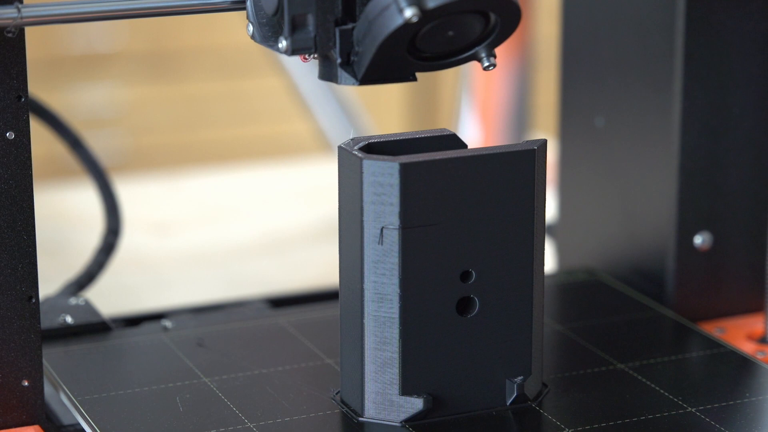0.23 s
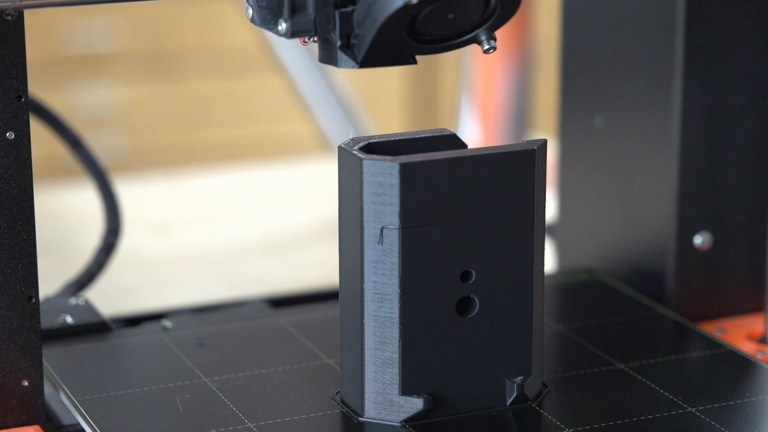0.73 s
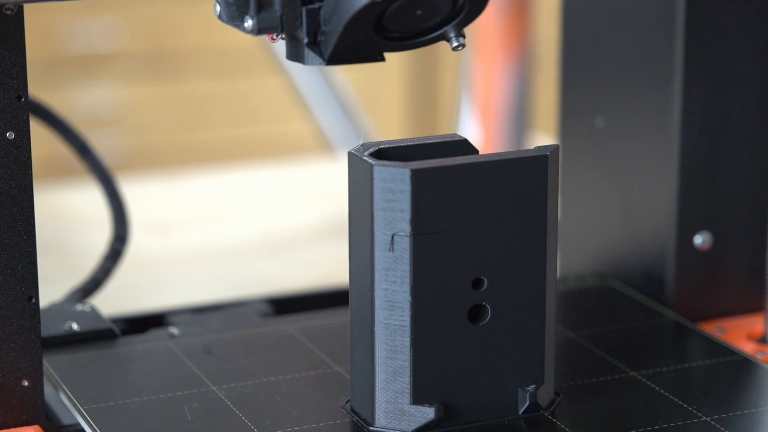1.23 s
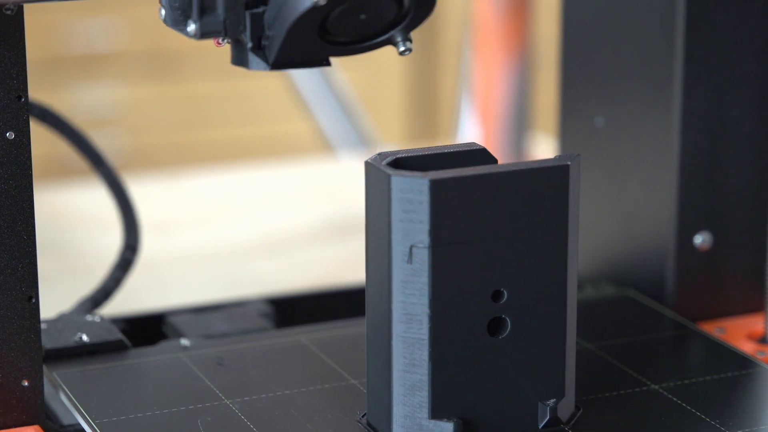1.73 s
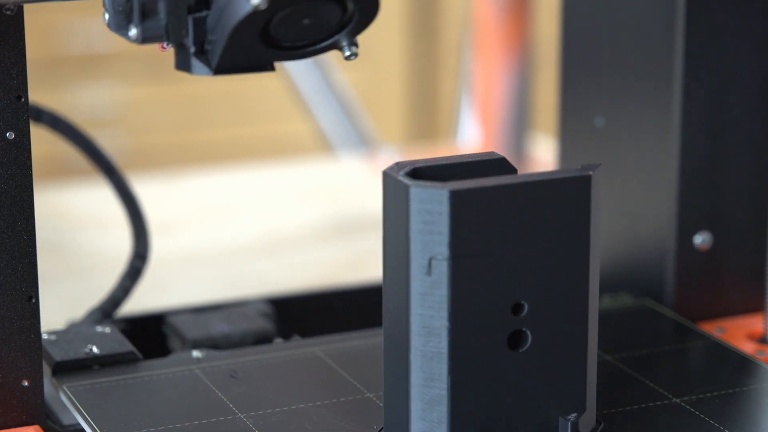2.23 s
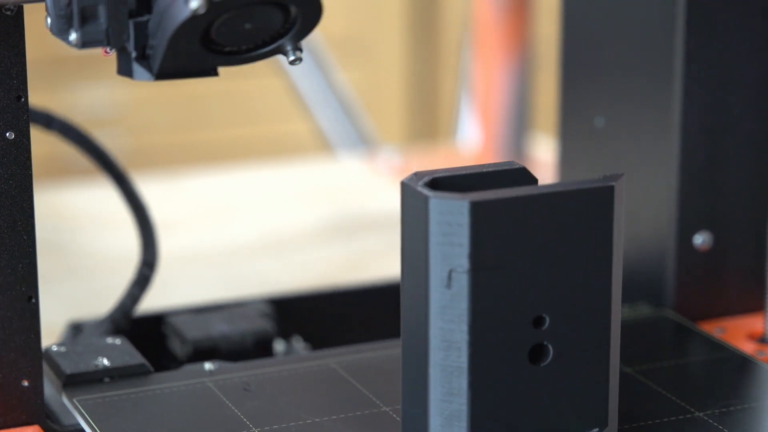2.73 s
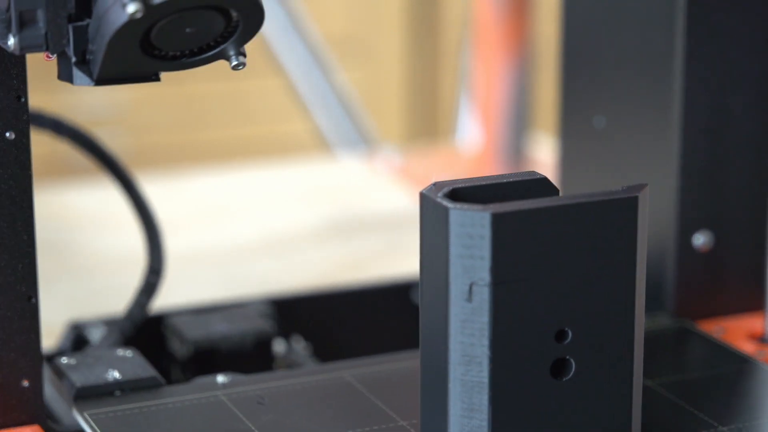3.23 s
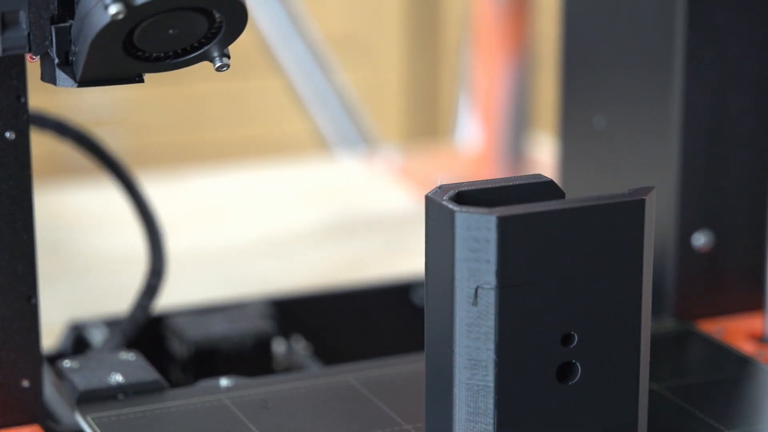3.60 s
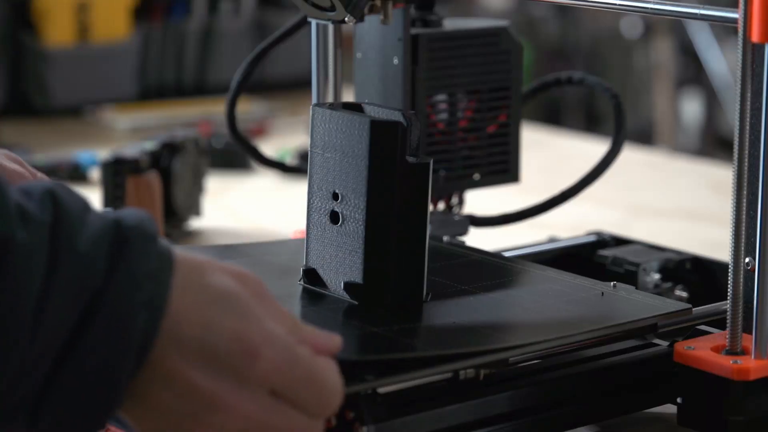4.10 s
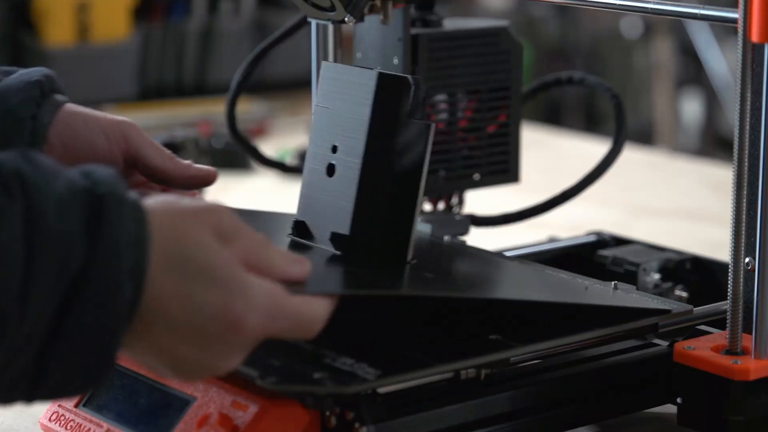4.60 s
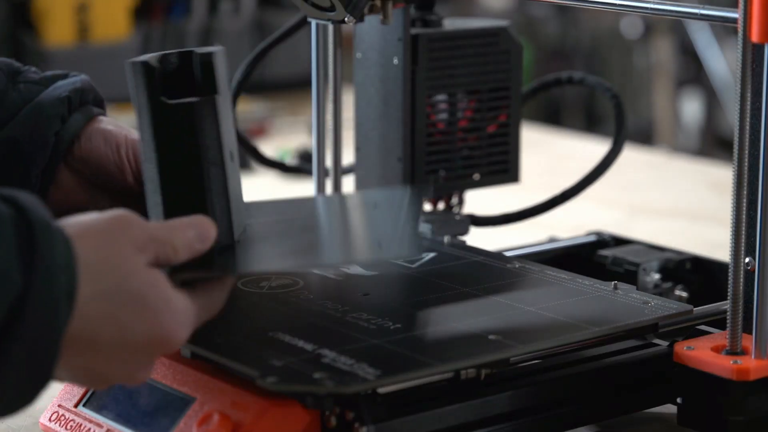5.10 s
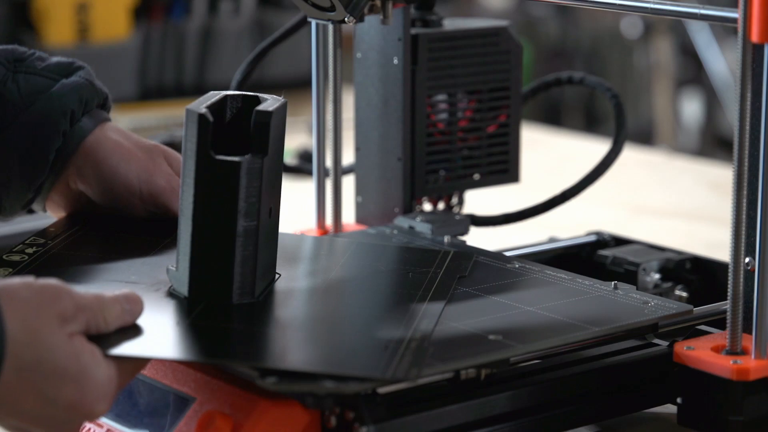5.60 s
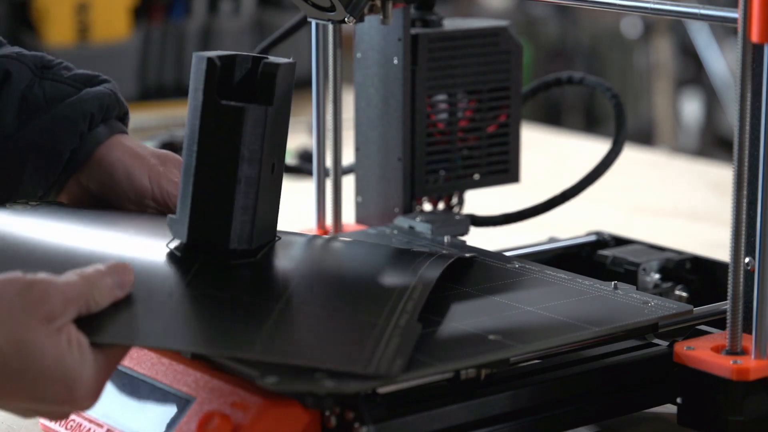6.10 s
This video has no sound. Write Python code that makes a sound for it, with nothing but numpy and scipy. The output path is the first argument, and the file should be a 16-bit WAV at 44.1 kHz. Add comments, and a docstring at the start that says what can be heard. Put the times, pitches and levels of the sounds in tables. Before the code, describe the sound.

Close view of a desktop 3D printer in a small workshop. A faint low motor hum with thin treble hiss gives way to a steady harmonic whine with small rattles, which brakes suddenly. Then bassier room air, cloth and skin sliding, a steel sheet rubbing, one hard knock, and a cluster of very loud, bright cracks with short metallic ringing as it is flexed.

```python
"""A desktop 3D printer's last travel: carriage and bed motors whine together, as harmonics of their step rates.
A slow humming move precedes it; the stepper drivers hiss in the high treble and moving parts rattle.
Then hands lift the spring-steel sheet off the bed (rubbing and sliding noise), knock it down again and flex it
until the printed part cracks loose: noise cracks with ringing modes. A small workshop adds diffuse reflections."""
import sys
import numpy as np
from scipy import signal
from scipy.fft import rfft, irfft, next_fast_len
from scipy.io import wavfile

SR = 44100
rng = np.random.default_rng(int(sys.argv[2]) if len(sys.argv) > 2 else 0)


def output_pcm(signal):
    """Save a mono or channel-first signal as 16-bit PCM at the path in sys.argv[1].

    Samples are clipped to [-1, 1] before scaling.
    """
    pcm = np.clip(np.atleast_2d(signal).T, -1, 1) * 32767
    wavfile.write(sys.argv[1], SR, np.round(pcm).astype(np.int16))


N = 280255
T = np.arange(N) / SR
HANDLING_START_S = 3.85  # the background also turns bassier here

# bed driver's hiss colour: (frequency [Hz], relative density [dB per Hz])
BED_DRIVER_COLOUR = [(12800, -40), (13700, -18), (14350, -9), (14750, -21), (15300, -6), (15750, -6),
                     (16100, -14)]
# reverberation time of the workshop: (frequency [Hz], t60 [s])
ROOM_DECAY = [(200, 0.85), (1000, 0.41), (5000, 0.41), (10000, 0.3), (16000, 0.34)]


def from_db(db):
    """Decibels to gain."""
    return 10 ** (np.asarray(db) / 20)


def rms_one(x):
    """Scale to rms 1."""
    return x / np.sqrt(np.mean(x ** 2) + 1e-20)


def at_hz(points, hz):
    """Interpolate a table on a log-frequency axis."""
    points = np.array(points)
    return np.interp(np.log(hz + 1e-9), np.log(points[:, 0]), points[:, 1])


def after(start_s, fade_s):
    """Smooth step from 0 to 1, centred on start_s."""
    return .5 + .5 * np.tanh((T - start_s) / fade_s)


def swell(peak_s, half_width_s):
    """Bell that reaches 1 at peak_s."""
    return np.exp(-np.minimum(((T - peak_s) / half_width_s) ** 2, 20))


def noise(colour):
    """Coloured noise, falling 12 dB per octave more below its first point; rms 1."""
    size = next_fast_len(N)
    hz = np.fft.rfftfreq(size, 1 / SR)
    gain = from_db(at_hz(colour, hz)) * np.minimum(hz / colour[0][0], 1) ** 2
    spectrum = gain * rfft(rng.standard_normal(size))
    return rms_one(irfft(spectrum)[:N])


def drift(rate_hz):
    """Slow random signal: white noise through two poles at rate_hz; spread 1."""
    hop, settle = 40, 2000  # drawn at SR / 40; the filter's start-up is dropped
    r = np.exp(-2 * np.pi * rate_hz * hop / SR)
    white = rng.standard_normal(N // hop + settle + 2)
    slow = signal.lfilter([1], [1, -2 * r, r * r], white)[settle:]
    return np.interp(np.arange(N) / hop, np.arange(len(slow)), rms_one(slow))


def narrow(hz, width_hz):
    """Resonance shaken at random: a carrier with drifting quadratures; rms 1."""
    in_phase = drift(width_hz) * np.cos(2 * np.pi * hz * T)
    quadrature = drift(width_hz) * np.sin(2 * np.pi * hz * T)
    return rms_one(in_phase + quadrature)


def dying_noise(t, level_db, t60):
    """Third-octave noise bands, each with its own level and decay; level_db is a function of Hz."""
    edges_hz, out = np.geomspace(120, 18000, 23), 0
    for low, high in zip(edges_hz, edges_hz[1:]):
        hz = np.sqrt(low * high)
        decay = from_db(-60 * t / at_hz(t60, hz))
        band_pass = signal.butter(2, [low, high], "band", fs=SR, output="sos")
        band = signal.sosfilt(band_pass, rng.standard_normal(len(t)) * decay + 1e-18)
        # band power follows its bandwidth and mean decay power
        band_rms = np.sqrt(np.mean(decay ** 2) * (high - low) * 2 / SR)
        out = out + rms_one(band) * band_rms * from_db(level_db(hz))
    return out


def workshop(x, wall_edge_hz=11000, build_s=0.0084):
    """Diffuse reflections that build up in milliseconds and mostly die sooner in the treble."""
    t = np.arange(SR * 2 // 3) / SR
    tail = dying_noise(t, lambda hz: -10 * np.log10(1 + (hz / wall_edge_hz) ** 2), ROOM_DECAY)
    tail = tail * (1 - np.exp(-(t / build_s) ** 2))
    return signal.fftconvolve(x, tail / np.sqrt(np.sum(tail ** 2)))[:N]


def motor(turns, orders, flutter, flutter_hz):
    """Harmonics of the base rate; the shaking frame makes each flutter in level and phase."""
    out = 0
    for order, db in orders:
        phase = 2 * np.pi * (order * turns + rng.random())
        steady = (1 + flutter * drift(flutter_hz)) * np.sin(phase)
        out = out + from_db(db) * (steady + flutter * drift(flutter_hz) * np.cos(phase))
    return np.sqrt(2) * out


def driver_hiss(turns, colour, depth_db, locked=.4):
    """Current-chopper hiss in bursts locked to the coil current; the share `locked` repeats cyclically."""
    hiss = noise(colour)
    cycle_samples = 1 / np.max(np.diff(turns))  # at full speed
    repeating = sum(np.roll(hiss, round(k * cycle_samples)) for k in range(8))
    mixed = np.sqrt(locked) * rms_one(repeating) + np.sqrt(1 - locked) * noise(colour)
    pulsing_db = depth_db * (np.cos(2 * np.pi * turns) + .7 * np.cos(4 * np.pi * turns))
    return rms_one(mixed * from_db(pulsing_db + drift(40)))


def step_buzz(turns):
    """The bed's step edges add a faint comb of high harmonics of its step rate; rms 1."""
    steps_per_cycle = 8
    orders = [(k, 0) for k in range(5, 13)]
    return rms_one(motor(steps_per_cycle * turns, orders, flutter=0.52, flutter_hz=37))


def background():
    """Coloured room air, giving way to bassier air with a low hum."""
    # air colour before handling: (frequency [Hz], relative density [dB per Hz])
    room_colour = [(18, -69), (30, -43), (53, -7.5), (210, -9.5), (295, -22), (394, -16.5), (584, -20.5),
                   (1960, -35.5), (2540, -33), (2900, -36), (5500, -51.5), (16000, -52)]
    # air colour during handling: (frequency [Hz], relative density [dB per Hz])
    bench_colour = [(25, -6.5), (45, 6.5), (65, 6), (110, 4.5), (145, -8.5), (300, -11), (650, -16.5),
                    (1200, -24.5), (2500, -30), (6000, -48), (10000, -48), (16000, -50)]
    air = from_db(-48.0) * noise(room_colour) * (1 - after(HANDLING_START_S, 0.0044))
    hum = motor(45.4 * T, [(1, -51.992)], flutter=.3, flutter_hz=3.4)
    bench = after(HANDLING_START_S, 0.0041) * (from_db(-42.5) * noise(bench_colour) + hum)
    return air + bench


def frame_shudder():
    """The frame shudders after braking: a damped 66 Hz sine."""
    start_s, decay_s = 3.45, 0.16
    envelope = after(start_s, 0.0092) * np.exp(-abs(T - start_s) / decay_s)
    return from_db(-34.5) * envelope * np.sin(2 * np.pi * 66 * T)


def sheet_wobble():
    """The flexed sheet wobbles in its lowest bending mode, swelling and settling."""
    return swell(5.95, .42) * motor(72.5 * T, [(1, -41.5)], flutter=0.087, flutter_hz=6.5)


def rattles():
    """Short bursts of dense ticking from the moving parts, which also knock the frame."""
    # bursts: (peak time [s], rise [s], fall [s], peak ticking level [dB rms], peak knock level [dB rms])
    bursts = [(0.019, 0.0073, 0.023, -53, -50), (.122, .006, 0.0057, -56, -47.5),
              (.152, 0.0019, 0.022, -51.5, -53), (1.037, .0015, 0.0042, -38, -28.5),
              (2.16, 0.031, 0.056, -50.5, -55), (2.562, 0.0085, 0.0087, -27.5, -57),
              (2.585, 0.0038, 0.028, -36, -48), (3.428, 0.0094, 0.0024, -47, -41)]
    # ticking colour: (frequency [Hz], relative density [dB per Hz])
    tick_colour = [(900, -26), (1550, 6), (1850, -13), (2230, 6), (2550, -3.5), (3800, 0), (7000, -5),
                   (10500, -3.5), (13000, -15), (16000, -18)]
    shapes = []
    for peak_s, rise_s, fall_s, *_ in bursts:
        distance = np.maximum((peak_s - T) / rise_s, (T - peak_s) / fall_s)
        shapes.append(np.exp(-distance.clip(0, 20)))
    tick_level, knock_level = from_db(np.array(bursts)[:, 3:].T) @ np.array(shapes)
    ticking = rms_one(noise(tick_colour) * from_db(2.3 * drift(300)))
    return tick_level * ticking + knock_level * narrow(1750, 260)


def handling():
    """Grainy rubbing and sliding as the sheet is lifted and carried; strokes add in power."""
    # hand strokes: (peak time [s], half-width [s], rub on bed [dB rms], slide of sleeve and skin [dB rms])
    hand_strokes = [(3.86, 0.089, -57.5, -78), (3.997, 0.023, -45.5, -63), (4.44, 0.086, -59, -59),
                    (4.58, 0.089, -52, -54), (4.72, 0.056, -40, -45), (4.81, 0.05, -48, -66),
                    (4.98, 0.044, -70, -61), (5.07, 0.017, -61, -52), (5.14, 0.052, -59, -71),
                    (5.245, .035, -63, -59), (5.33, 0.027, -74, -60), (5.47, 0.041, -59, -51.5),
                    (5.72, 0.025, -49, -61)]
    # rubbing colour: (frequency [Hz], relative density [dB per Hz])
    rub_colour = [(400, -15.5), (650, 1), (950, 6.5), (1200, -2.5), (1550, 0.5), (2500, -3.5), (3300, -1),
                  (4500, 1.5), (6500, -1), (8700, -4.5), (10500, -11.5), (16000, -22.5)]
    # sliding colour: (frequency [Hz], relative density [dB per Hz])
    slide_colour = [(2000, -32), (5000, -2.5), (9000, 3), (14000, 1), (16000, 1.5)]
    carry = (5.06, 1.1, -63.5, -66)  # faint rustle under the strokes, same columns
    scratch_db = 2.6  # spread of the grain
    strokes = np.array([*hand_strokes, carry])
    shapes = np.array([swell(peak_s, half_width_s) for peak_s, half_width_s, *_ in strokes])
    rub_level, slide_level = np.sqrt(from_db(strokes[:, 2:].T) ** 2 @ shapes ** 2)
    rub = rub_level * rms_one(noise(rub_colour) * from_db(scratch_db * drift(200)))
    slide = slide_level * rms_one(noise(slide_colour) * from_db(scratch_db * drift(300)))
    return after(HANDLING_START_S, 0.0031) * (rub + slide)


def sheet_hits():
    """Each contact gives a short crack, sets the sheet ringing and scatters into the room."""
    # knocks and cracks: (time [s], crack [dB], treble edge [Hz], treble tilt [dB per octave], ring [dB])
    hits = [(4.0256, -28, 4960, -2, -43.5), (4.2083, -12.5, 9200, -1, -35.5),
            (4.3716, -42, 14000, -3.5, -73), (4.562, -44, 8000, -8.5, -46), (5.306, -44, 8000, 1, -67),
            (5.3295, -48, 8000, -8, -64), (5.4774, -14.5, 7540, -2.5, -34), (5.5301, -9.5, 9950, -2, -21.5),
            (5.7392, -4, 15900, 1, -33), (6.014, -46, 8000, -1.5, -69.5), (6.114, -25.5, 10200, -3, -43),
            (6.127, -40, 14000, -3, -57), (6.224, -36, 6000, -4, -50)]
    # ringing modes: (frequency [Hz], relative level [dB], t60 [s])
    modes = [(170, -13.5, 0.13), (228, -16.5, 0.2), (395, -11, 0.19), (453, -12.5, 0.62),
             (555, -10.5, 0.17), (641.3, 0.5, 0.37), (663, -2.5, 0.11), (724, -16.5, 0.18),
             (820, -17.5, 0.36), (906, -10, 0.44), (976, -7.5, 0.3), (1103, -8.5, 0.49),
             (1470, -11.5, 0.18), (1560, -8.5, 0.13), (1670, -27, 0.28), (2320, -20, 0.16),
             (2280, -18, 0.46), (2490, 0, 0.095)]
    # dense, quickly damped high modes: (frequency [Hz], relative density [dB per Hz])
    crack_colour = [(150, -16), (400, -12.5), (800, -5), (1220, -8.5), (1600, -2), (1900, -3), (2500, -4.5),
                    (3100, -2.5), (4050, 2.5), (4900, 0.5), (5700, 1.5), (7800, 1), (9000, 2), (16000, 5.5)]
    # their decay: (frequency [Hz], t60 [s])
    crack_t60 = [(200, 0.078), (1000, 0.075), (4000, 0.023), (8000, 0.015), (16000, 0.0089)]
    # crowd of weaker modes: (frequency [Hz], relative density [dB per Hz])
    clatter_colour = [(150, -9), (320, -15), (620, -7.5), (1080, -1.5), (1220, -17), (1500, -18),
                      (2600, -7), (5000, -8.5), (8500, -10.5), (11000, -32), (16000, -42)]
    # their decay: (frequency [Hz], t60 [s])
    clatter_t60 = [(200, 0.15), (1000, 0.11), (16000, 0.2)]
    # colour of the room's reflections: (frequency [Hz], relative level [dB])
    scatter_colour = [(200, 3), (800, 15), (2000, 5.5), (5000, -1), (16000, -7.5)]
    lift_s = 4.5
    out, t = np.zeros(N + SR), np.arange(SR // 2) / SR
    for hit_s, crack_db, edge_hz, tilt_db, ring_db in hits:

        def crack_level(hz):
            tilted = at_hz(crack_colour, hz) + tilt_db * np.log2(hz / 4000)
            return tilted - 10 * np.log10(1 + (hz / edge_hz) ** 8)

        hit = from_db(crack_db) * dying_noise(t, crack_level, crack_t60)
        # the sheet radiates differently in every direction, so its reflections blend into a smooth tail
        tail = dying_noise(t, lambda hz: crack_level(hz) + at_hz(scatter_colour, hz), ROOM_DECAY)
        hit += from_db(crack_db - 20) * (1 - np.exp(-t / 0.0027)) * tail
        hit += from_db(ring_db + 1) * dying_noise(t, lambda hz: at_hz(clatter_colour, hz), clatter_t60)
        # held by the bed's magnets it is stiffer and rings higher
        pitch = 1.08 if hit_s < lift_s else 1
        for hz, db, t60_s in modes:
            # every mode is a close pair that beats
            phase = 2 * np.pi * pitch * hz * t
            detune = 1 + rng.choice([-1, 1]) * rng.uniform(.01, .03)
            pair = rng.choice([-1, 1]) * (np.sin(phase) + .5 * np.sin(phase * detune))
            hit += from_db(ring_db + db - 4.5 - 60 * t / t60_s) * pair
        start = round(hit_s * SR)
        out[start:start + len(t)] += hit
    return out[:N]


def slow_move():
    """The slow move: low motor hum, driver hiss, bearing noise and a thin whistle."""
    # motor vibration: (multiple of base rate, level [dB rms])
    creep_orders = [(2, -58.5), (3, -51), (4, -51.5), (6, -59.5), (8, -64), (12, -65), (20, -72.5),
                    (27, -73), (33, -77), (55, -77)]
    # bearing noise colour: (frequency [Hz], relative density [dB per Hz])
    bearing_colour = [(30, -20), (62, 3.5), (130, -4.5), (300, -29), (700, -18), (1200, -24), (2000, -26.5),
                      (3200, -34), (4200, -29.5), (5500, -33.5), (7500, -34.5), (10000, -30.5),
                      (16000, -31)]
    creep_hz, end_s = 74.8, 0.98
    turns = creep_hz * T
    hum = motor(turns, creep_orders, flutter=0.38, flutter_hz=13.0)
    hiss = from_db(-49.5) * driver_hiss(turns, BED_DRIVER_COLOUR, depth_db=2.5)
    whistle = from_db(-66.5) * narrow(6390, 42)
    bearings = from_db(-48) * noise(bearing_colour)
    return (1 - after(end_s, .01)) * (hum + hiss + whistle + bearings)


def travel():
    """Carriage and bed speed up together, run steadily and brake; motor pitch follows speed."""
    # carriage motor vibration: (multiple of base rate, level [dB rms])
    carriage_orders = [(3, -55), (4, -52.5), (8, -65), (10, -54.5), (11, -52.5), (17, -70), (21, -58)]
    # bed motor vibration before the approach gain: (multiple of base rate, level [dB rms])
    bed_orders = [(1, -65.5), (2, -42), (3, -68.5), (6, -52.5), (9, -57), (11, -62.5)]
    # belt or frame resonances lifting an order: (peak time [s], half-width [s], multiple, peak [dB rms])
    resonances = [(1.1, 0.44, 7, -48), (1.3, 0.6, 16, -55.5), (1.45, 2.4, 5, -47), (1.72, 1.29, 6, -35),
                  (2.5, 0.31, 16, -56), (3.35, 0.9, 7, -54), (3.38, 0.16, 16, -61.5)]
    # carriage driver's hiss colour: (frequency [Hz], relative density [dB per Hz])
    carriage_driver_colour = [(7500, -10), (9200, -7.5), (10400, -1.5), (10900, -5), (11800, 1.5),
                              (12100, 1), (12400, -18), (12800, -9), (14000, -9.5)]
    # motor housing resonances: (frequency [Hz], width [Hz], level at full speed [dB rms])
    housing = [(8900, 79, -66.5), (11870, 76, -68.5), (12330, 110, -59)]
    # rolling noise colour: (frequency [Hz], relative density [dB per Hz])
    rail_colour = [(30, -12), (60, 7), (100, 8), (140, -16), (230, 3.5), (330, -14.5), (570, -11.5),
                   (900, -12.5), (1500, -15), (2600, -22), (4100, -21.5), (6000, -28), (10000, -29.5),
                   (16000, -21.5)]
    carriage_hz, bed_hz = 188.93, 124.0  # base rates at full speed
    start_s, stop_s, ramp_s = .942, 3.447, .057
    bed_near_s, bed_near_db, bed_rise_db_per_s = 2.38, 1.7, 5
    pulse_db = 3.0
    hiss_at_rest = 0.2  # share of the hiss gain left as speed nears zero

    speed = np.clip(np.minimum(T - start_s, stop_s - T) / ramp_s, 0, 1)
    full_speed_s = np.cumsum(speed) / SR  # distance as time at full speed
    carriage_turns, bed_turns = carriage_hz * full_speed_s, bed_hz * full_speed_s

    carriage = motor(carriage_turns, carriage_orders, flutter=0.18, flutter_hz=44)
    belt_turns = carriage_turns + 0.0065 * drift(7.8)
    belt = 0
    for peak_s, half_width_s, order, db in resonances:
        lifted = motor(belt_turns, [(order, db)], flutter=0.09, flutter_hz=30)
        belt = belt + swell(peak_s, half_width_s) * lifted
    # the bed grows louder as it comes forward, until it is near
    bed_db = bed_near_db - bed_rise_db_per_s * np.maximum(bed_near_s - T, 0)
    bed = from_db(bed_db) * motor(bed_turns, bed_orders, flutter=.2, flutter_hz=4.6)
    buzz = from_db(-61.5) * step_buzz(bed_turns)
    # all but the bed's own whine builds only near full speed
    whine = speed ** 4 * (carriage + belt + buzz) + speed * bed

    hiss = from_db(-42.5) * driver_hiss(bed_turns, BED_DRIVER_COLOUR, pulse_db, locked=0.38)
    hiss += from_db(-53) * driver_hiss(carriage_turns / 2, carriage_driver_colour, pulse_db, locked=0.18)
    hiss += sum(from_db(db) * narrow(hz, width_hz) for hz, width_hz, db in housing)
    hiss *= hiss_at_rest + (1 - hiss_at_rest) * speed
    running = after(0.92, 0.0082) * (1 - after(3.433, 0.0071))
    hiss *= running

    # on the ramps the fifth order sweeps roughly, loudest at half speed
    fifth_order = motor(5 * carriage_turns, [(1, 0)], flutter=.45, flutter_hz=70)
    sweep = from_db(-43) * 4 * speed * (1 - speed) * fifth_order
    rolling = running * from_db(-43.5) * noise(rail_colour)
    room_send = from_db(-7.5) * (rolling + sweep) + from_db(-28) * hiss + from_db(-17) * whine
    return whine + sweep + hiss + rolling + workshop(room_send)


def scene():
    """Sum printer, sheet, hands and room into one channel."""
    small = rattles() + handling()
    small_room = workshop(from_db(-11) * small)
    sheet = sheet_hits() + sheet_wobble()
    printer = slow_move() + travel() + frame_shudder()
    return (background() + small + small_room + sheet + printer)[None]


def record(dry):
    """Input overload soft-limits peaks towards 1.15; a steep low-pass cuts the top."""
    cutoff_hz = 15750
    clipped = dry / (1 + (dry / 1.15) ** 4) ** .25
    low_pass = signal.ellip(12, .1, 80, cutoff_hz, fs=SR, output="sos")
    return signal.sosfilt(low_pass, clipped)


dry = scene()
out = record(dry)
output_pcm(out)
```